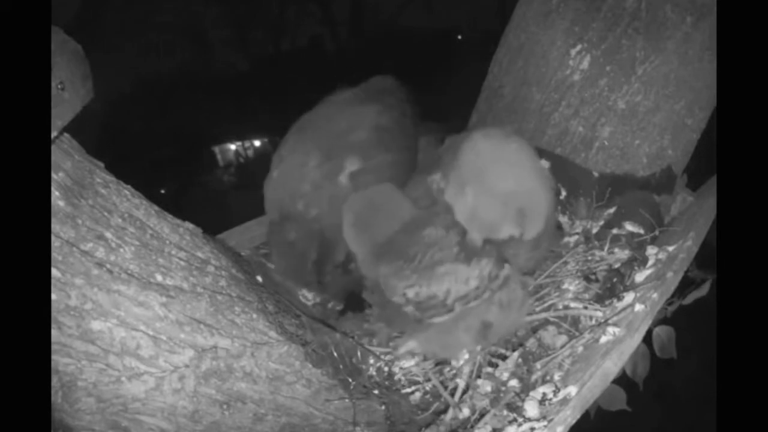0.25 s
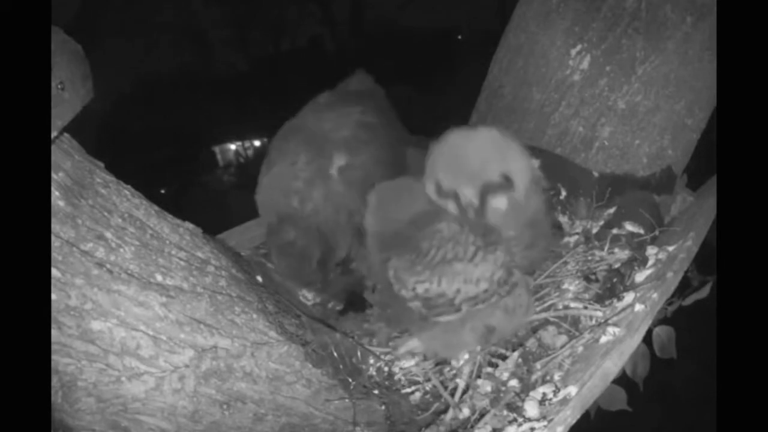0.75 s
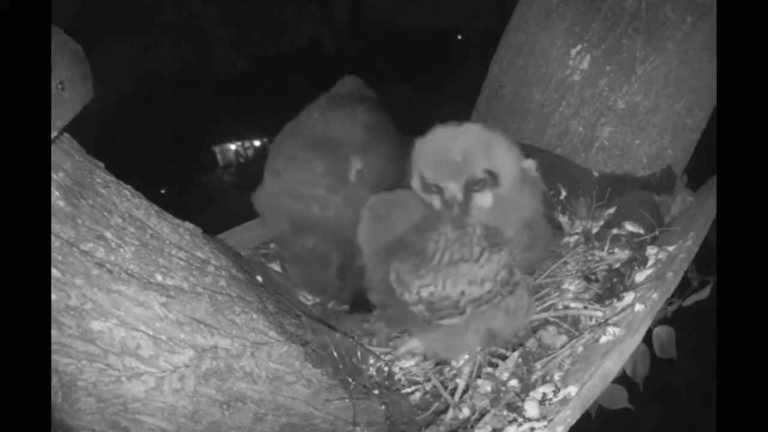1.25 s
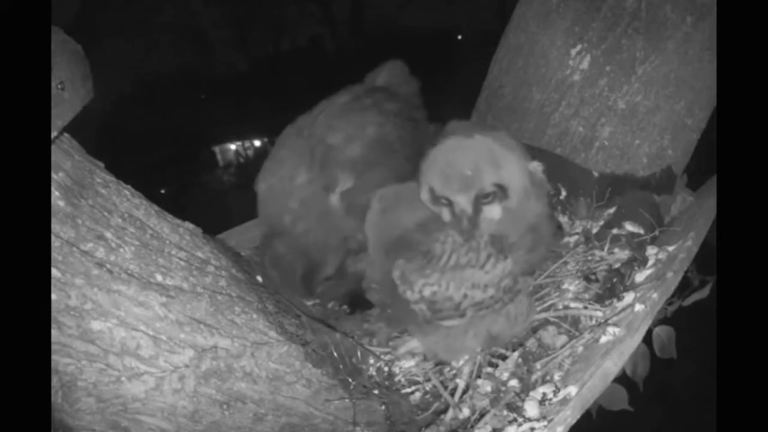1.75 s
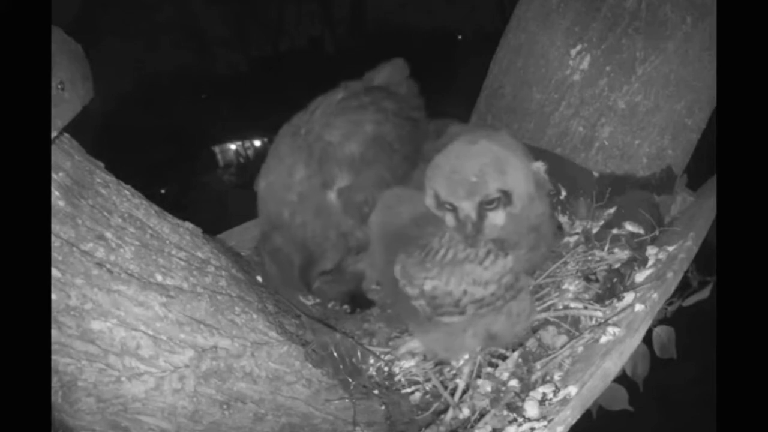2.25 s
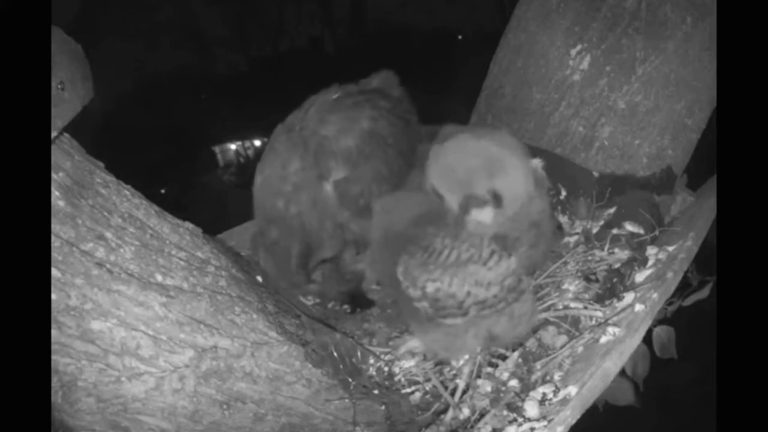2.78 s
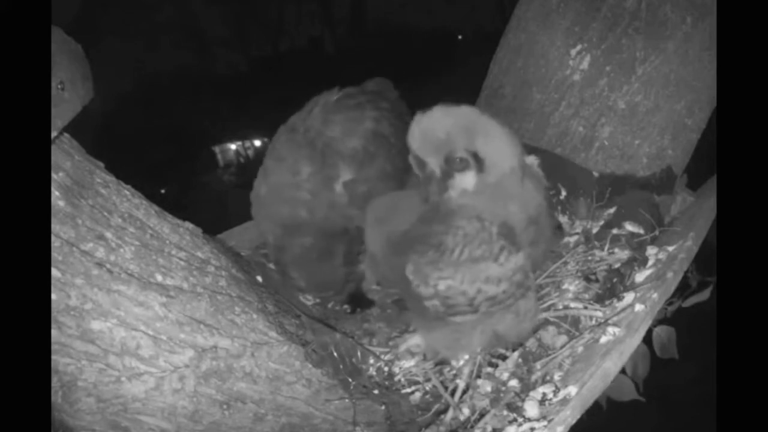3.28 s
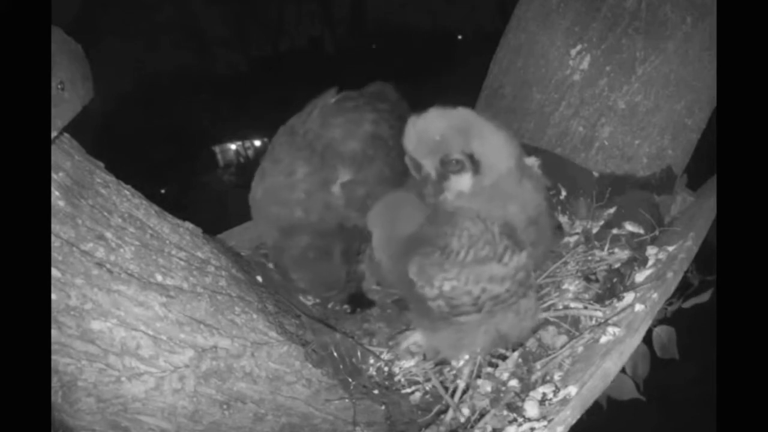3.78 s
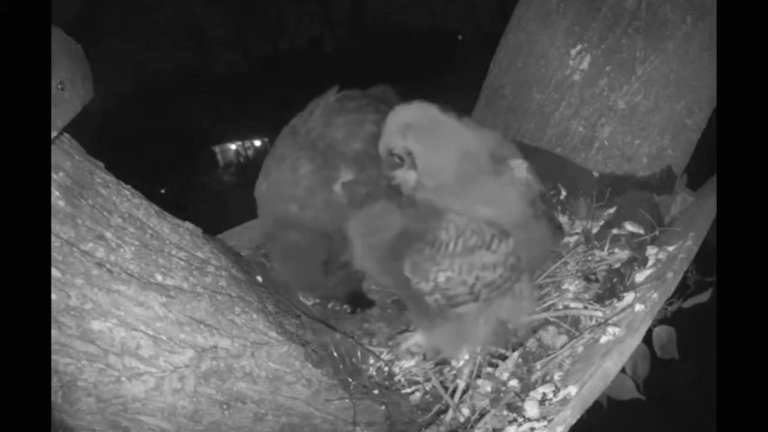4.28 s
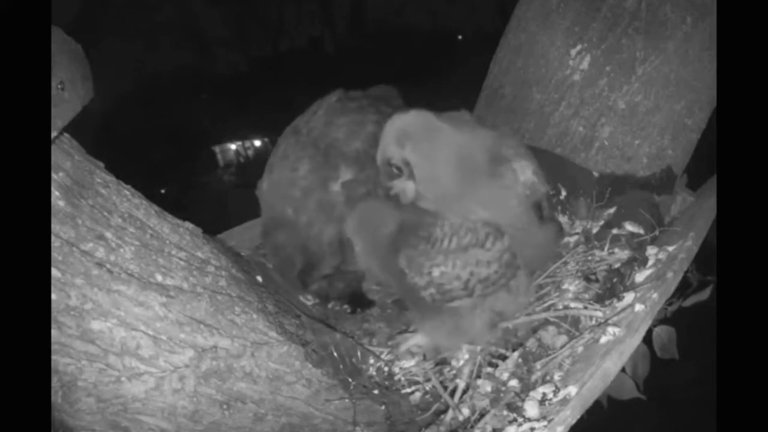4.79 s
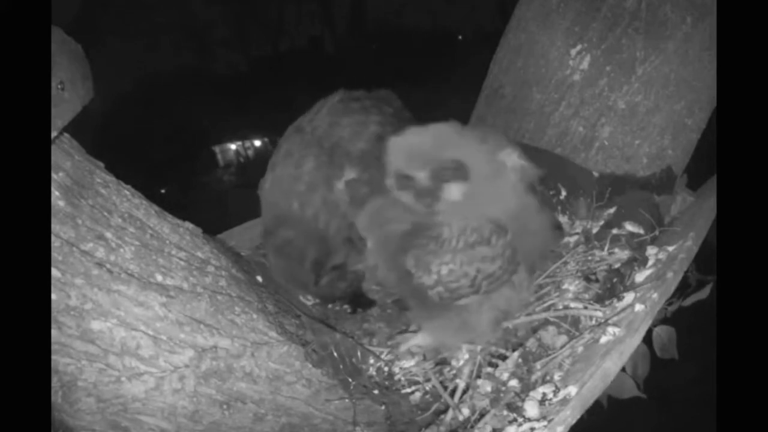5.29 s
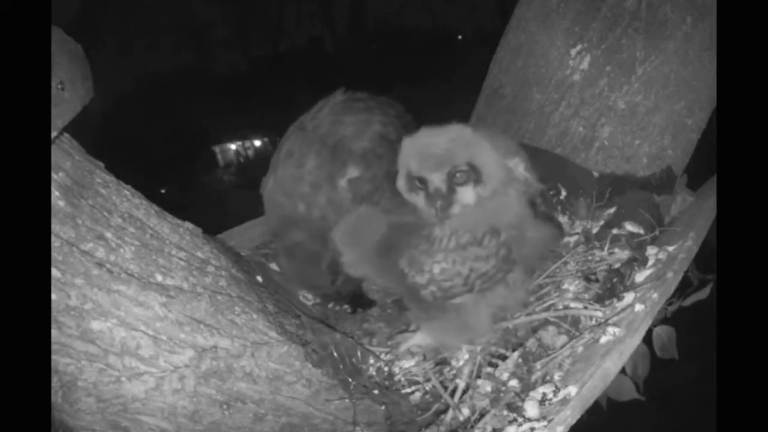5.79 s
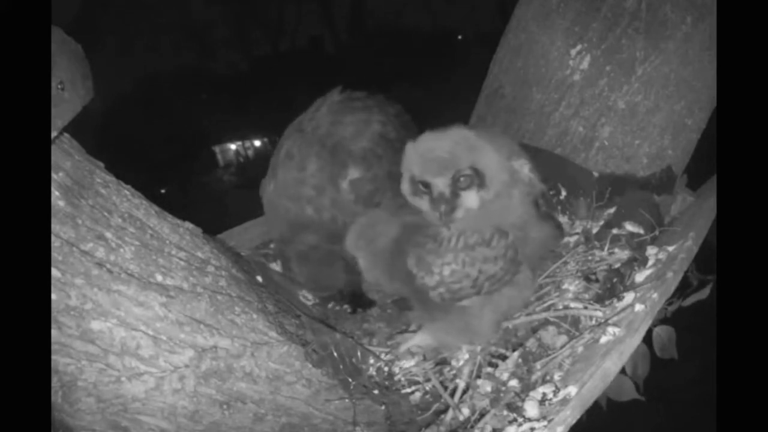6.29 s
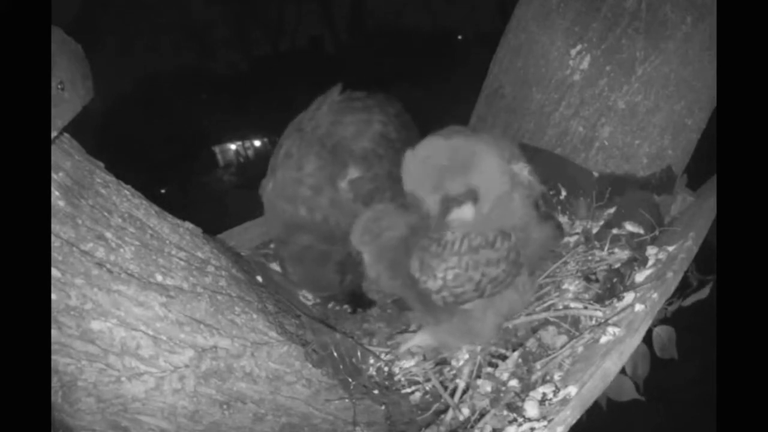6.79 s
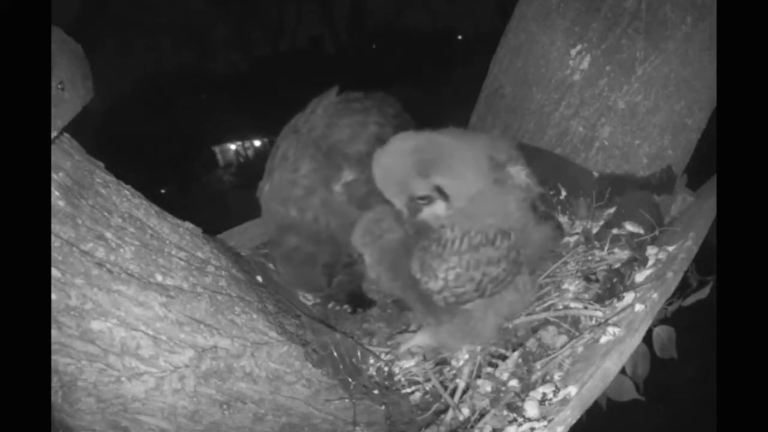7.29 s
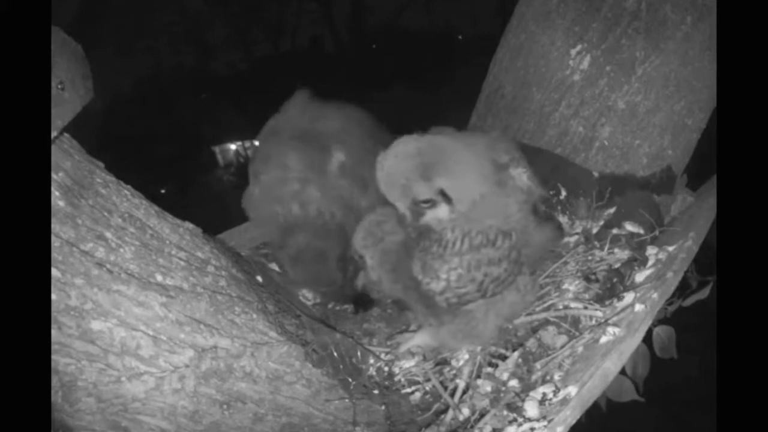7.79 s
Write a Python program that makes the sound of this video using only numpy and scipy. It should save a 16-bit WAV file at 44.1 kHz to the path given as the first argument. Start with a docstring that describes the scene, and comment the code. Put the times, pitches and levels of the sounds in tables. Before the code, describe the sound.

Young owls give three harsh raspy begging screeches in a tree nest at night, with dull nest bumps, twig ticks and soft adult hoots.

```python
"""Owlets beg in a tree nest at night: three screeches, two rasping and one clearer in two voices, swell
and end in a falling whistle, with faint peeps between; air chopped by an uneven flutter drives them.
An adult hoots softly in gliding partials. The shuffling birds bump the nest in filtered thuds, crackle
its lining in filtered clicks and snap twigs in noise bursts. Far off, what may be wind chimes ring
in beating pairs of tones over a steady wash of night air."""
import sys
import numpy as np
from scipy import signal
from scipy.fft import rfft, irfft
from scipy.io import wavfile

SR = 44100
rng = np.random.default_rng(int(sys.argv[2]) if len(sys.argv) > 2 else 0)


def wav_out(sig):
    """Save sig, one row per channel (or a flat mono array), as 16-bit PCM at SR to the path in sys.argv[1]."""
    wavfile.write(sys.argv[1], SR, np.round(np.clip(np.atleast_2d(sig).T, -1, 1) * 32767).astype(np.int16))


N = 354960
TIME = np.arange(N) / SR
EDGE_HZ = 15800  # upper limit of the band

# Night air, relative spectrum: f/Hz, level/dB
AIR_SPECTRUM = [(35, -67), (60, -49), (145, -54), (220, -18), (312, -7.5), (368, -8.5), (423, -2.5),
                (559, -2), (657, -4), (738, -7.5), (910, -8), (1870, -25), (4120, -23), (6260, -41.5),
                (15500, -46.5)]
# Distant chime strokes: t/s, level/dB, f/Hz, t60/s
CHIME_STROKES = [(3.271, -75.5, 1440, 2.3), (4.464, -67.5, 920.5, 8.4), (4.464, -58.5, 2406, 0.82),
                 (4.629, -68, 2714, 0.78), (5.724, -66.5, 2722, 0.65), (7.667, -71.5, 2420, 0.81)]
# Dry twigs and down, relative spectrum: f/Hz, level/dB
RUSTLE_SPECTRUM = [(130, -45), (900, -5), (1900, -5.5), (3200, 3), (5300, -1), (7000, -13.5), (7900, -31),
                   (10700, -28), (15000, -32)]
# Bouts of stirring: middle t/s, half length t/s, rustle level/dB, patter level/dB
STIRRING_BOUTS = [(.09, 0.11, -84, -50), (0.533, 0.24, -77.5, -71.5), (1.21, 0.15, -67, -68.5),
                  (1.18, 0.043, -80, -60.5), (2.428, 0.061, -85, -53.5), (3.902, 0.99, -78, -76),
                  (5.503, 0.063, -84, -61), (7.801, 0.51, -77, -68)]
# Twig snaps and bill clicks: t/s, peak level/dB, f/Hz that places the band
TWIG_SNAPS = [(.069, -45, 1220), (1.127, -55, 4800), (1.195, -51.5, 4100), (1.251, -57, 4480),
              (1.284, -54, 2840), (1.375, -58, 4770), (1.491, -52.5, 5230), (2.067, -55.5, 3130),
              (3.623, -50, 3500), (4.724, -53, 3963), (4.984, -56.5, 4670), (5.023, -53, 4910),
              (6.889, -59, 4500)]
# Dull bumps on the nest: t/s, first peak level/dB, f/Hz that places the upper edge, taps in the stutter
NEST_KNOCKS = [(.018, -37, 423, 1), (.027, -36.5, 480, 1), (.062, -30.5, 534, 1), (.071, -20.5, 592, 1),
               (.125, -35.5, 404, 1), (.133, -37.5, 497, 1), (.165, -39.5, 460, 1), (.652, -42.5, 430, 1),
               (1.139, -43, 434, 1), (1.161, -40.5, 445, 1), (1.217, -43, 345, 1), (2.345, -42, 450, 1),
               (2.389, -37, 526, 1), (2.394, -25.5, 412, 3), (2.47, -35, 450, 1), (5.033, -23.5, 546, 1),
               (5.044, -26.5, 440, 1), (5.068, -22.5, 413, 3), (5.442, -50, 400, 1), (5.537, -48, 380, 1),
               (7.817, -36, 420, 1), (7.828, -37, 405, 1)]
# The adult's hoots, single or stuttering: first syllable t/s, crest t/s, last syllable t/s,
# crest level/dB, crest f/Hz
ADULT_HOOTS = [(2.824, 2.824, 2.824, -44, 303.3), (3.15, 3.15, 3.14, -48.5, 294.4),
               (3.242, 3.242, 3.487, -46, 301.2), (4.308, 4.402, 4.645, -46.5, 296.1),
               (5.083, 5.12, 5.275, -47, 297)]
# Echoes of the owlets off the two trunks and the nest rim: delay t/s, level/dB
CLOSE_ECHOES = [(.0031, -18), (.0058, -16), (.0094, -22)]
# Peeps, wheezes and the chirps that lead into a screech: t/s, length t/s, level/dB,
# first f/Hz, last f/Hz, arch f/Hz, roughness (0-1)
PEEP_NOTES = [(0.245, 0.037, -62.5, 3790, 3430, 2, 0.2), (0.267, 0.1, -75.5, 6500, 6130, 2, 0.33),
              (.34, 0.2, -68, 3040, 2970, 0.5, 0.62), (0.478, 0.11, -74, 4970, 3800, -2, .25),
              (0.587, 0.12, -68.5, 4130, 3830, -200, 0.21), (0.677, 0.019, -59.5, 4260, 3540, 0, .04),
              (3.246, .06, -72, 5600, 5560, -4, 0.4), (3.83, .024, -50.5, 1060, 1237, -3, 0.02),
              (3.865, 0.034, -36.5, 2960, 3173, 45, 0.01), (3.866, 0.039, -58.5, 5490, 5660, 1, .7),
              (3.891, 0.039, -47, 3030, 3070, 0, 0), (3.9, .075, -49.5, 3830, 3630, -1, .3),
              (6.123, 0.039, -55, 3640, 3750, 54, 0.23), (6.155, 0.033, -60.5, 3850, 3770, 4, 0.7),
              (6.152, 0.13, -69, 4920, 4550, 951, .5), (6.256, .026, -56, 2860, 2970, 4, 0.12)]
# Screech voices; the middle screech has two, one from each side of the syrinx: start t/s, surge t/s,
# bill closes t/s, first level/dB, last level/dB, surge level/dB, climax level/dB,
# pitch f/Hz, dip in the surge f/Hz, climax pitch f/Hz, roughness (0-1)
SCREECH_VOICES = [(1.506, 1.662, 1.855, -54.5, -28.5, 6, 5.5, 3630, 0, 3920, .94),
                  (3.926, 4.08, 4.145, -42.5, -37, 6.5, 0.5, 2815, 45.5, 3100, .25),
                  (4.028, 4.081, 4.143, -43, -38.5, 0, 0.5, 3890, 379.5, 3849, 0.1),
                  (6.261, 6.441, 6.596, -54.5, -31, 4, 7, 3955, -0.5, 4080, .93)]
# Relative colour of the rasp in each screech at its median pitch: f/Hz, level/dB
FIRST_COLOUR = [(150, -62), (500, -13.5), (1700, -30), (2350, -17.5), (2800, -1.5), (3700, 1.5),
                (4700, -9.5), (5400, -21), (6200, -41.5), (7900, -29.5), (11500, -54), (14000, -40.5),
                (15800, -37)]
SECOND_COLOUR = [(150, -50), (500, -5), (1500, -22), (2400, -12), (2950, 5.5), (3700, 1), (4700, -9),
                 (5600, -8.5), (6300, -36.5), (10800, -38), (12200, -29.5), (15800, -50)]
THIRD_COLOUR = [(150, -58.5), (520, -12.5), (1800, -33), (2800, -11), (3950, 3), (4700, -5.5), (5400, -13),
                (6100, -32.5), (7000, -36.5), (8800, -27), (12300, -50.5), (15500, -41)]
# Whistle overtones, before the higher ones roll off and all flicker: f/Hz, level/dB under the fundamental
OVERTONE_LEVELS = [(4000, -18.5), (5600, -21), (6500, -34), (8000, -32), (11000, -42), (15500, -33)]


def gain_of(db):
    """Turns decibels into gain."""
    return 10 ** (np.asarray(db) / 20)


def evened(x):
    """Scales a sound to rms 1."""
    return x / np.sqrt(np.mean(x ** 2) + 1e-20)


def hump(u):
    """Draws a bell curve of height 1 around u = 0."""
    return np.exp(-u ** 2)


def read(points, hz):
    """Reads a spectrum on a log-frequency axis."""
    f, value = np.transpose(points)
    return np.interp(np.log(hz + 1), np.log(f + 1), value)


def add(mix, s, sound):
    """Mixes a sound in at time s, trimmed to the scene."""
    start = round(s * SR)
    sound = sound[max(-start, 0):]
    part = mix[max(start, 0):][:len(sound)]
    part += sound[:len(part)]


def coloured(x, points):
    """Filters x by the spectrum of the points."""
    hz = np.fft.rfftfreq(len(x), 1 / SR)
    return irfft(rfft(x) * gain_of(read(points, hz)), len(x))


def wander(n, rate_hz):
    """Drifts at random with rms 1, moving little faster than the rate."""
    hz = np.fft.rfftfreq(N, 1 / SR)
    drift = irfft(rfft(rng.standard_normal(N)) * hump(hz / rate_hz), N)
    return evened(drift)[:n]


def band(x, low_hz, high_hz, order):
    """Passes x through a causal high-pass and low-pass."""
    x = signal.sosfilt(signal.butter(order, low_hz, "high", fs=SR, output="sos"), x)
    return signal.sosfilt(signal.butter(order, high_hz, fs=SR, output="sos"), x)


def grains(per_s, spread_db):
    """Scatters clicks of uneven size and random sign."""
    size = gain_of(spread_db * np.minimum(rng.exponential(1, N), 4))
    return size * rng.choice([-1, 1], N) * (rng.random(N) < per_s / SR)


def night_air(level_db=-66.5, swell_db=1.5):
    """A far-off wash of coloured noise that hardly swells."""
    wash = evened(coloured(rng.standard_normal(N), AIR_SPECTRUM))
    return gain_of(level_db + swell_db * wander(N, 3)) * wash


def chimes(rise_s=0.0037, split=0.0068, partner=0.37):
    """Distant metal tubes: each stroke is a dying pair of close modes that beat."""
    out = np.zeros(N)
    for s, db, hz, t60 in CHIME_STROKES:
        t = TIME[:round(t60 * SR)]
        pair = np.sin(2 * np.pi * hz * t) + partner * np.sin(2 * np.pi * hz * (1 + split) * t)
        envelope = gain_of(db - 60 * t / t60) * (1 - np.exp(-t / rise_s))
        add(out, s, envelope * pair)
    return out


def trees(x, t60_s=.5, gap_s=.008):
    """A thin scatter from trunks and branches: x smeared by a tail of dying noise."""
    t = TIME[:SR]
    tail = rng.standard_normal(SR) * gain_of(-60 * t / t60_s) * (t > gap_s)
    return signal.oaconvolve(x, tail / np.linalg.norm(tail))[:N]


def blow(hz, low_hz=320, above=1.107):
    """One dead thud of the nest: a click through a narrow band that rings briefly; peak 1."""
    thud = band(signal.unit_impulse(2048), low_hz, hz * above, order=5)
    return thud / abs(thud).max()


def shuffling(patter_hz=390, rest_rustle_db=-84, rest_patter_db=-78):
    """Stirring birds crackle the dry lining and patter on the nest, in bouts that swell and fade."""
    ticks = grains(1800, 3)
    crackle = evened(coloured(ticks * gain_of(2.7 * wander(N, 40)), RUSTLE_SPECTRUM))
    steps = grains(120, 4)
    patter = evened(signal.oaconvolve(steps, blow(patter_hz))[:N])
    # the birds are never quite still
    rustle_power, patter_power = gain_of(rest_rustle_db) ** 2, gain_of(rest_patter_db) ** 2
    for s, half, rustle_db, patter_db in STIRRING_BOUTS:
        bout = hump((TIME - s) / half)
        rustle_power = rustle_power + bout * gain_of(rustle_db) ** 2
        patter_power = patter_power + bout * gain_of(patter_db) ** 2
    return np.sqrt(rustle_power) * crackle + np.sqrt(patter_power) * patter


def twigs(t60_s=0.025, low_share=0.66, high_share=0.94):
    """Each snap or click is a tiny dying burst of noise in its own band."""
    out, t = np.zeros(N), TIME[:1024]
    for s, db, hz in TWIG_SNAPS:
        burst = rng.standard_normal(len(t)) * gain_of(-60 * t / t60_s)
        snap = band(burst, hz * low_share, hz * high_share, order=3)
        add(out, s, gain_of(db) * snap / abs(snap).max())
    return out


def bumps(stutter_s=.0245, stutter_db=-5, scuff_db=-13, scuff_hz=440, scuff_s=0.01):
    """Feet and wings knock on the nest, rebound weaker each time, and scuff around the knocks."""
    out = np.zeros(N)
    for s, db, hz, taps in NEST_KNOCKS:
        thud = blow(hz)
        start = s - abs(signal.hilbert(thud)).argmax() / SR  # the first thud peaks at s
        for k in range(round(taps)):
            add(out, start + k * stutter_s, gain_of(db + k * stutter_db) * thud)
    around = np.exp(-abs(np.arange(-SR // 4, SR // 4) / SR) / scuff_s)
    pressure = np.sqrt(abs(signal.oaconvolve(out ** 2, around / around.sum(), "same")))
    scuff = evened(signal.oaconvolve(grains(400, 5.5), blow(scuff_hz))[:N])
    return out + gain_of(scuff_db) * pressure * scuff


def syllables(gap_s=.064, rise_s=0.13, fall_s=.24, drop=.16, fade_db=-11, fade_curve=3):
    """Evenly spaced pushes of air, lower and softer away from each hoot's crest: t/s, level/dB, f/Hz."""
    for first, crest, last, db, hz in ADULT_HOOTS:
        for s in np.linspace(first, last, 1 + round(abs(last - first) / gap_s)):
            away = max((crest - s) / rise_s, (s - crest) / fall_s)
            yield s, db + fade_db * away ** fade_curve, hz * (1 - drop * away ** 2)


def adult(half_s=.0215, sag=.04, octave_db=-1, third_db=-36, waver=0.013, low_cut_hz=270):
    """Soft hoots of a fundamental, its octave and a trace of a third; pitch arches with each push of air."""
    push, pitch = np.full(N, 1e-12), np.full(N, 1e-10)  # tiny floors keep the pitch defined in silence
    u = np.arange(-3, 3, 1 / (SR * half_s))
    for s, db, hz in syllables():
        swell = gain_of(db) * np.exp(-.6 * abs(u) ** 2.3)
        start = s - len(u) / SR / 2
        add(push, start, swell)
        add(pitch, start, swell * hz * (1 - sag * u ** 2))
    hz = pitch / push  # overlapping syllables share a weighted pitch
    phase = 2 * np.pi * np.cumsum(hz * (1 + waver * wander(N, 80))) / SR
    low_loss = 1 / np.sqrt(1 + (low_cut_hz / hz) ** 14)  # the microphone loses the lowest notes
    fundamental = low_loss * np.cos(phase)
    octave = gain_of(octave_db) * np.cos(2 * phase)
    third = gain_of(third_db) * np.cos(3 * phase)
    return push * (fundamental + octave + third)


def syrinx(flutter_hz=420, flutter_db=2.0, jitter_hz=500):
    """Drives the owlets' voices: an uneven flutter, the air it chops, and the pitch's unsteadiness."""
    flutter = evened(gain_of(flutter_db * wander(N, flutter_hz)))
    return flutter, flutter * rng.standard_normal(N), wander(N, jitter_hz)


def voice(level_db, hz, rough, colour, drive, bright_db=0, jitter=.07, chop=0.49):
    """A whistle that breaks up into a rasp of noise, whose resonances drop as the pitch falls."""
    flutter, air, unsteady = (d[:len(hz)] for d in drive)
    rough = np.clip(rough, 0, 1)
    phase = 2 * np.pi * np.cumsum(hz * (1 + jitter * rough * unsteady)) / SR
    overtones = 0
    for k in range(2, 6):
        strength = gain_of(read(OVERTONE_LEVELS, k * hz)) * (2 / k) ** 2
        overtones = overtones + strength * (k * hz < EDGE_HZ) * np.sin(k * phase)
    # the overtones come and go
    tone = np.sin(phase) + gain_of(bright_db) * overtones * unsteady
    whistle = evened(tone * flutter ** (chop * rough))
    f, t, z = signal.stft(air, SR, nperseg=256, noverlap=192)
    # the resonances drop as the bill closes, but never rise above their usual place
    stretch = np.minimum(np.interp(t, TIME[:len(hz)], hz) / np.median(hz), 1)
    z = z * gain_of(read(colour, f[:, None] / stretch))
    rasp = evened(signal.istft(z, SR, nperseg=256, noverlap=192)[1][:len(hz)])
    return gain_of(level_db) * (np.sqrt(1 - rough) * whistle + np.sqrt(rough) * rasp)


def peep(length, db, first_hz, last_hz, arch_hz, rough, drive, peak=0.46, taper=0.98, waver_depth=.06):
    """One short note that glides along an arch, loudest at the peak share of its length."""
    *breath, waver = drive
    u = np.linspace(0, 1, round(length * SR))
    hz = first_hz + (last_hz - first_hz) * u + arch_hz * np.sin(np.pi * u)
    hz = hz * (1 + waver_depth * rough * waver[:len(u)])  # a rough peep wavers in pitch
    envelope = np.sin(np.pi / 2 * np.interp(u, [0, peak, 1], [0, 1, 0])) ** taper
    # the first screech's rasp, shifted from 3600 Hz to this note's pitch
    colour = np.array(FIRST_COLOUR) * [hz.mean() / 3600, 1]
    return envelope * voice(db, hz, rough, colour, breath)


def screech(row, colour, attack_s=.01, swell_curve=0.91, surge_s=.033, climax_s=.018, close_s=.053):
    """A voice swells, surges once, clears toward a whistle at its climax and falls as the bill closes."""
    start, surge_at, close_at, first_db, last_db, surge_db, climax_db = row[:7]
    pitch_hz, dip_hz, climax_hz, rough = row[7:]
    t = np.arange(0, close_at + close_s - start, 1 / SR)
    held = close_at - start
    swell = np.minimum(t / held, 1) ** swell_curve
    surge = hump((start + t - surge_at) / surge_s)
    climax = hump(np.maximum(held - t, 0) / climax_s)
    closing = np.maximum(t - held, 0)
    roughness = rough + (min(rough, .3) - rough) * climax
    level_db = first_db + (last_db - first_db) * swell + surge_db * surge + climax_db * climax
    level_db += -43.5 * (closing / close_s) ** 1.75  # the whistle dies
    level_db += 1.54 * roughness * wander(len(t), 29.98)  # dB, Hz: a ragged swell
    hz = pitch_hz * (1 + .014 * wander(len(t), 35.3))  # the pitch is never quite steady
    hz += (climax_hz - pitch_hz) * climax - dip_hz * surge
    hz *= 1 - .24 * rough * np.exp(-t / .007)  # a rough voice slides up into its pitch
    hz *= 2 ** (-15.5 * closing)  # octaves per second
    bright_db = 4 * climax  # the overtones flare at the climax
    return np.minimum(t / attack_s, 1) * voice(level_db, hz, roughness, colour, syrinx(), bright_db)


def owlets(peep_waver_hz=35.2):
    """The three begging screeches and the peeps between them, streaked by close echoes."""
    out, drive = np.zeros(N), (*syrinx(), wander(N, peep_waver_hz))
    colours = [FIRST_COLOUR, SECOND_COLOUR, FIRST_COLOUR, THIRD_COLOUR]
    for row, colour in zip(SCREECH_VOICES, colours):
        add(out, row[0], screech(row, colour))
    for s, *note in PEEP_NOTES:
        add(out, s, peep(*note, [d[round(s * SR):] for d in drive]))
    direct = out.copy()
    for delay, db in CLOSE_ECHOES:
        add(out, delay, gain_of(db) * direct)
    return out


def scene(owlet_echo_db=-43, hoot_echo_db=-20):
    """The nest close by, the night around it."""
    young, hoots = owlets(), adult()
    echo = trees(gain_of(owlet_echo_db) * young + gain_of(hoot_echo_db) * hoots)
    background = night_air() + chimes() + echo
    nest = shuffling() + twigs() + bumps()
    return (background + nest + hoots + young)[None]


def record(dry, bass_cut_hz=190, bass_floor_db=-10.5, notch_hz=6400, notch_db=-4):
    """The small microphone has weak bass and a notch in the treble; then the band limit."""
    hz = np.fft.rfftfreq(N, 1 / SR)
    bass = np.maximum(1 / np.sqrt(1 + (bass_cut_hz / (hz + 1)) ** 14), gain_of(bass_floor_db))
    notch = gain_of(notch_db * hump((hz - notch_hz) / 500))
    thin = irfft(rfft(dry) * bass * notch, N)
    edge = signal.firwin(511, EDGE_HZ, window=("kaiser", 9), fs=SR)
    return signal.oaconvolve(thin, edge[None], "same")


dry = scene()
out = record(dry)
wav_out(out)
```